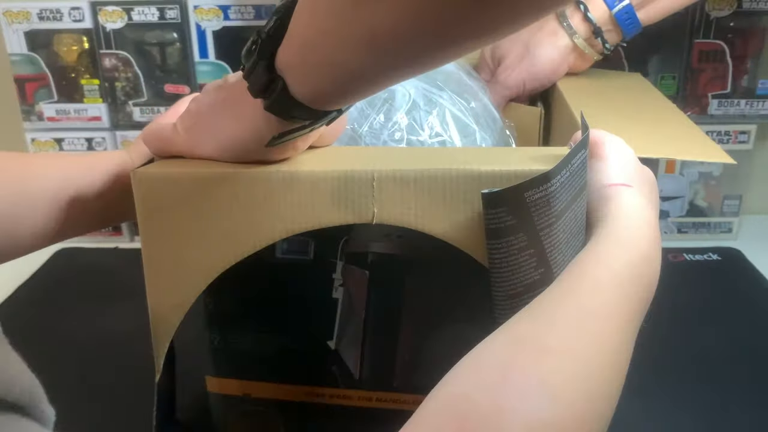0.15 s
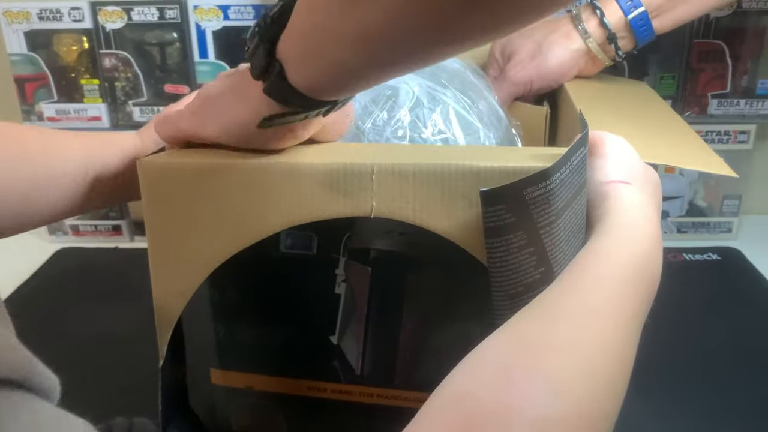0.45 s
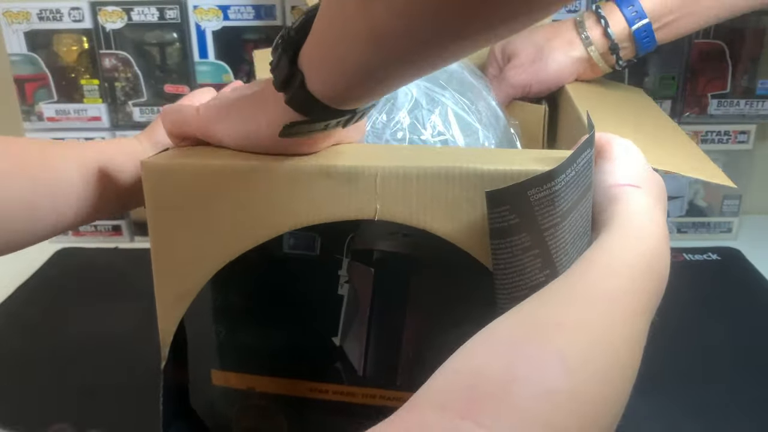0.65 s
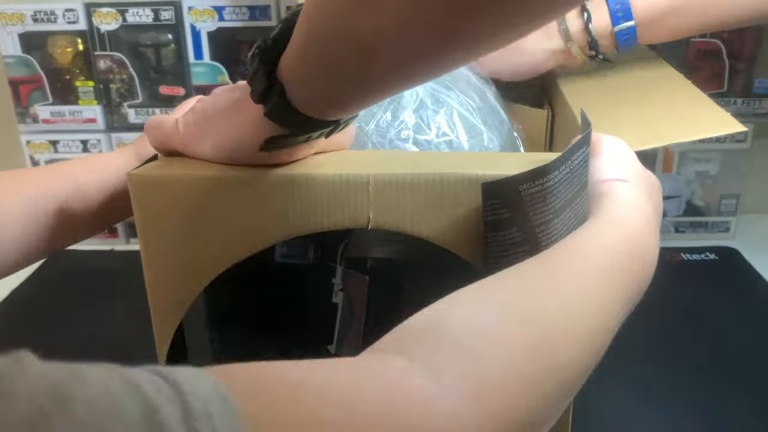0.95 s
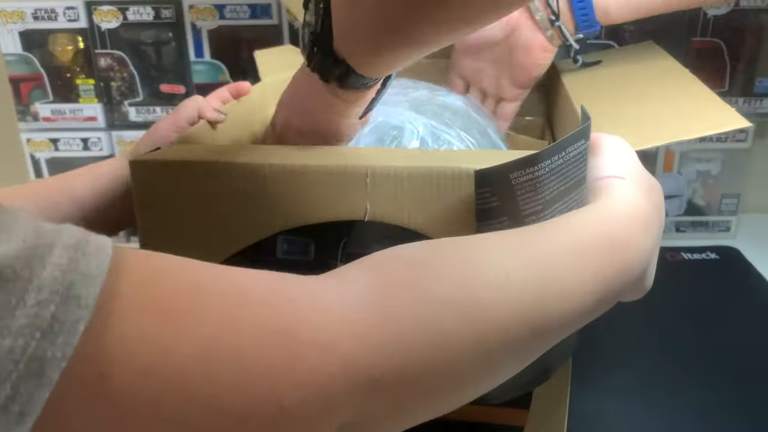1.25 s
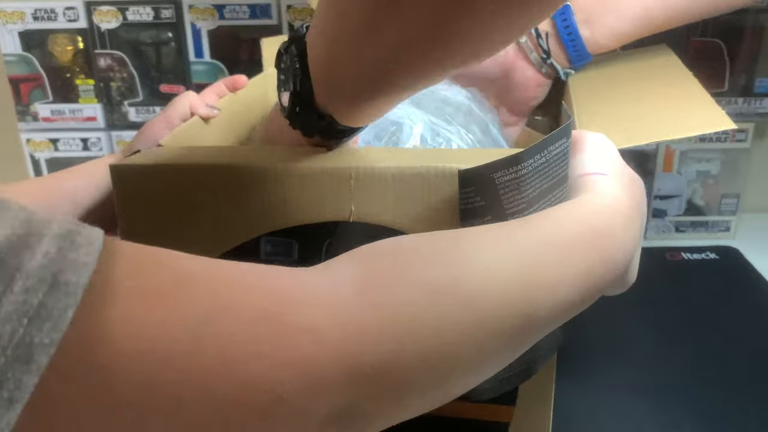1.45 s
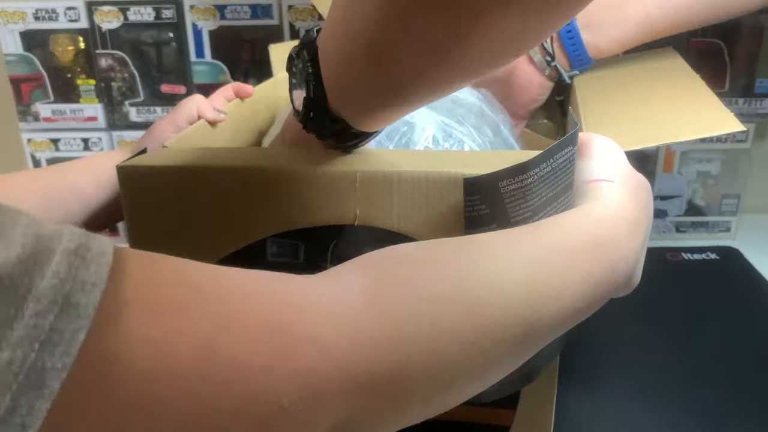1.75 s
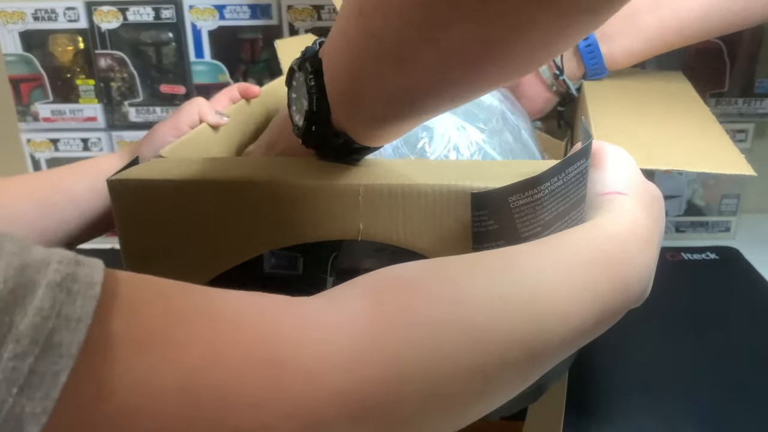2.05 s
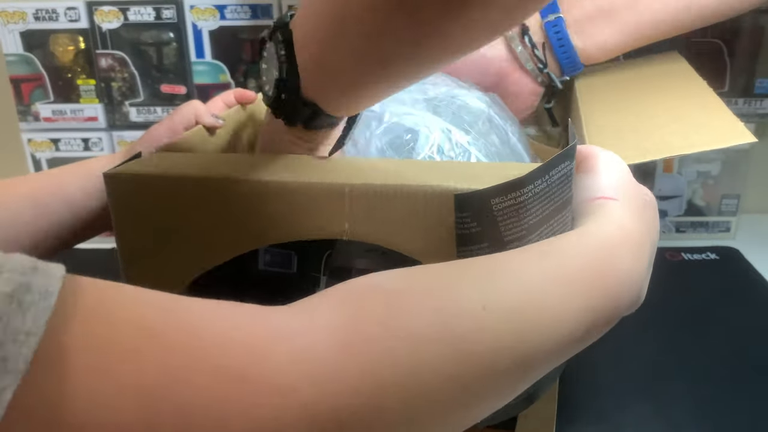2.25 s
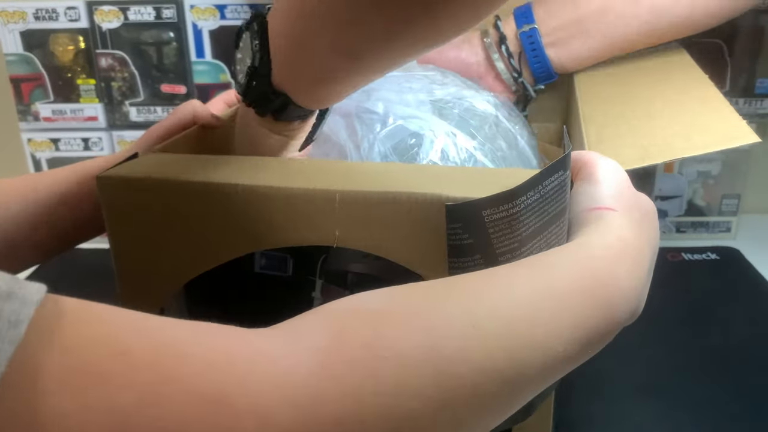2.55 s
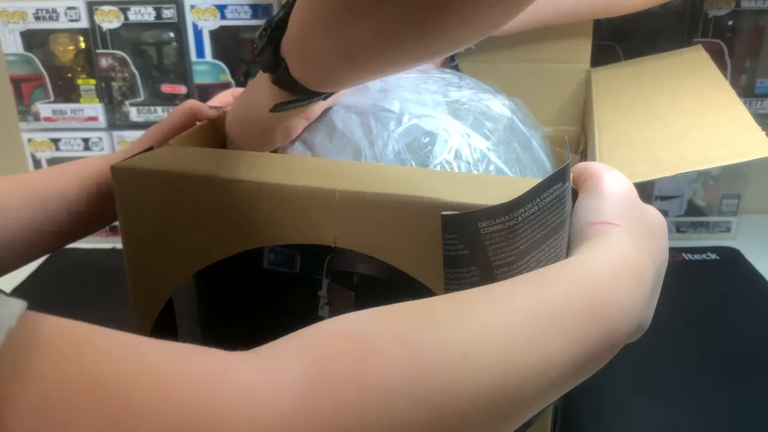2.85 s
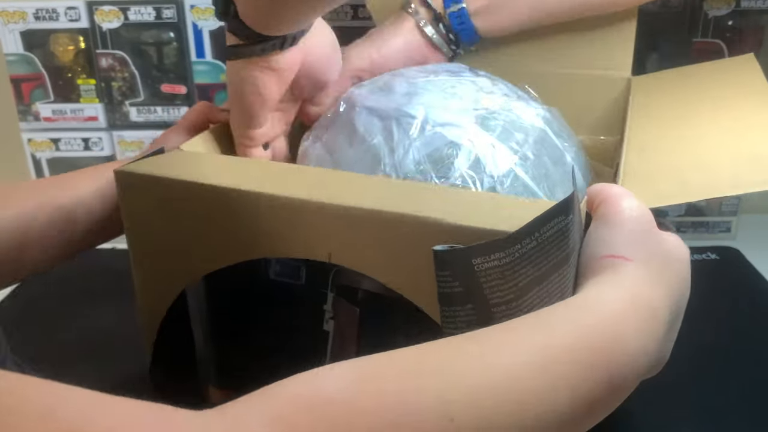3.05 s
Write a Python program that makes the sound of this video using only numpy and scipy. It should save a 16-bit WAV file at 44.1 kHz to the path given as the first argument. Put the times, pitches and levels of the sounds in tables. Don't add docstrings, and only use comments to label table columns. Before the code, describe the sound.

Stiff cardboard packing cracks and pops while hands rub the carton and plastic wrap rustles.

```python
import sys
import numpy as np
from scipy import signal
from scipy.fft import rfft, irfft
from scipy.io import wavfile
from scipy.ndimage import uniform_filter1d

SR = 44100
rng = np.random.default_rng(int(sys.argv[2]) if len(sys.argv) > 2 else 0)


def voltage_ratio(decibels):
    exponent = np.asarray(decibels, float) / 20
    return 10 ** exponent


def generate_wav(sig):
    pcm = np.round(np.clip(np.atleast_2d(sig).T, -1, 1) * 32767).astype(np.int16)
    wavfile.write(sys.argv[1], SR, pcm)


N = 141120

# (frequency [Hz], level [dB])
HUM_SPECTRUM = [(59, -54), (100, 12), (181, 18), (801, 9), (10200, -5), (16000, -65)]
# (start [s], length [s], board rubbing [dB], wrap rustle [dB], low scuff [dB])
STROKES = [(-.08, 0.29, -45, -49.5, -76), (0.213, 0.068, -51, -46.5, -70), (0.34, 0.061, -49, -62, -85),
           (0.476, .16, -45.5, -47, -80), (0.594, 0.19, -39.5, -45, -36), (0.73, 0.37, -45.5, -47, -63),
           (0.972, 0.16, -39.5, -44, -65), (1.138, 0.19, -34, -44.5, -47), (1.244, 0.19, -35, -38.5, -42.5),
           (1.404, 0.13, -34.5, -40, -46.5), (1.604, 0.25, -39.5, -48.5, -48),
           (1.841, 0.17, -41.5, -52, -48), (2.06, 0.71, -36.5, -41.5, -54), (2.654, 0.21, -29.5, -39, -40),
           (2.815, 0.23, -40.5, -40, -45.5), (2.953, 0.45, -38, -41.5, -48.5), (3.11, 0.37, -60, -36, -80)]
# (board rubbing, wrap rustle, low scuff) [dB]
REST_DB = [-53, -57, -56]
# (frequency [Hz], level [dB])
BOARD_SPECTRUM = [(59, -63), (100, -16.5), (355, -42), (693, -7.5), (768, -3.5), (1470, -7.5), (2070, -11),
                  (3290, -26), (6000, -40), (9000, -60)]
# (frequency [Hz], level [dB])
SCUFF_SPECTRUM = [(150, -5), (260, -4.5), (450, -6), (650, -11)]
# (frequency [Hz], level [dB])
WRAP_SPECTRUM = [(1200, -26), (1830, -10), (3150, -10), (7390, -13), (14600, -18), (16000, -15)]
# (time [s], frequency [Hz], level [dB])
SQUEAK = [
    (1.362, 1784, -62),
    (1.375, 2030, -17.5),
    (1.378, 1610, -21.5),
    (1.387, 1534, -16),
    (1.393, 1610, -53),
    (1.404, 1670, -32),
    (1.41, 1560, -48),
]
# (time [s], level [dB], push length [s])
THUDS = [
    (1.2057, -16, 0.0041),
    (1.212, -11.5, 0.0017),
    (2.609, -15.5, 0.001),
    (2.954, -26, 0.0008),
]
# (frequency [Hz], level [dB])
THUD_MODES = [(320, -16), (390, -15), (460, 23)]
# (time [s],
# level [dB], frequency [Hz], rise [s])
POPS = [(0.053, -23, 1550, 0.0017), (0.666, -5, 2920, 0.00033), (0.67, -8.5, 787, 0.0016),
        (0.843, -21.5, 690, 0.0021), (0.981, -17.5, 801, 0.0035), (1.0792, -21, 5050, 0.00023),
        (1.2052, -0.5, 417, 0.0021), (1.214, -12.5, 786, 0.0017), (1.258, -25, 393, 0.0036),
        (1.268, -22, 900, .003), (1.282, -26, 2270, 0.0015), (1.301, -26, 1525, 0.0028),
        (1.306, -23, 778, 0.0072), (1.316, -22, 800, 0.0081), (1.314, -22.5, 413, 0.0059),
        (1.325, -19, 970, 0.0025), (1.333, -17, 402, 0.0029), (1.383, -23, 450, 0.0028),
        (1.431, -16, 1170, 0.00092), (1.433, -22.5, 845, 0.0021), (1.439, -18, 1590, 0.0016),
        (1.561, -3, 816, 0.0026), (1.806, -7, 3670, 0.0012), (1.809, -5.5, 586, 0.0022),
        (1.852, 4, 1823, 0.00078), (1.854, -5.5, 877, 0.0028), (2.045, -10.5, 950, 0.0022),
        (2.209, -19, 897, .002), (2.261, -18.5, 720, 0.0022), (2.279, -19.5, 1650, 0.00093),
        (2.283, -17, 630, 0.0015), (2.341, -21.5, 804, 0.0043), (2.375, -20, 437, 0.0015),
        (2.389, -22.5, 1990, .0015), (2.424, -17, 772, 0.0025), (2.472, -24, 816, 0.0018),
        (2.53, -7, 2250, .0015), (2.732, -21, 1005, 0.0014), (2.753, -17, 1060, 0.0015),
        (2.782, -9.5, 650, 0.001), (2.812, -19, 1620, 0.0023), (2.815, -23.5, 340, 0.0028),
        (2.939, -10.5, 1810, 0.0005), (2.943, -22, 340, 0.002), (2.958, -15, 1274, .002),
        (2.964, -11.5, 1004, 0.0016), (2.96, -17.5, 317, 0.0014), (3, -20.5, 1600, .002),
        (3.02, -23, 667, 0.0034), (3.087, -22.5, 977, 0.0023)]
# (time [s], box ring [dB], crack [dB], film [dB], slip length [s])
SNAPS = [(0.666, -10, -18, -55, 0.0025), (1.08, -30, -21, -7.5, 0.00072), (1.204, -7, -22.5, -43, 0.0026),
         (1.559, -0.5, -1, 0.5, 0.00073), (1.8056, 0, -4.5, -5, 0.0032), (1.815, -11.5, -17, -24, 0.0029),
         (1.848, 3.5, -3, 1, 0.0053), (2.005, -3, -14, -11, 0.0092), (2.0397, 4.5, -5.5, -4, 0.0016),
         (2.101, -10, -19.5, -14, 0.022), (2.1085, 3, -6, -14, 0.001), (2.53, -7, -13.5, -23, 0.016),
         (2.546, -20, -19, -10.5, 0.0036), (2.592, -16.5, -37, -9.5, 0.025), (2.601, -2, -12, -4, 0.005),
         (2.734, -7, -16.5, -4.5, 0.00063), (2.941, -15, -23.5, -10.5, 0.01),
         (2.956, -5.5, -27, -19, 0.0016), (2.962, -17.5, -46, -26, 0.002)]
# (time [s], box ring [dB], crack [dB], film [dB])
TAPS = [(0.01, -26.5, -34.5, -28), (0.052, -12.5, -50, -59), (0.539, -34, -41, -30.5),
        (0.606, -29.5, -38, -22.5), (0.841, -22, -54, -55), (0.899, -14.5, -45, -34),
        (0.98, -18.5, -28.5, -55), (1.11, -22, -39, -56), (1.245, -38, -29.5, -44),
        (1.334, -14.5, -44, -54), (1.427, -17, -52, -49), (1.441, -39, -36, -17),
        (1.535, -26, -30.5, -21.5), (1.691, -16.5, -40, -45), (1.704, -22.5, -47, -53),
        (1.77, -17.5, -34.5, -24), (1.992, -15, -46, -31), (2.206, -24, -33, -29.5),
             (2.259, -17.5, -49, -31), (2.282, -18.5, -34, -28), (2.34, -14.5, -42, -45),
             (2.389, -24, -50, -21.5), (2.425, -22, -62, -59), (2.47, -16, -57, -31.5),
             (2.688, -16.5, -46, -22), (2.709, -32, -52, -40), (2.755, -8.5, -35, -46),
             (2.782, -11, -35, -26), (2.813, -24, -28, -17.5), (2.868, -21.5, -52, -27),
             (2.999, -16, -31, -20.5), (3.019, -35, -34, -14.5), (3.056, -17.5, -30.5, -31),
             (3.085, -19, -54, -23), (3.141, -24, -36, -20.5)]
# (box, crack, film) [dB]
TRIM_DB = [-1, 12, 2]
# (frequency [Hz], level [dB])
BOX_MODES = [(310, -22), (462, 2), (590, 0), (670, 0), (800, 3), (920, 2), (1020, -3), (1190, -6)]
# (frequency [Hz], level [dB])
PACKING_MODES = [(1400, -26), (1770, 14.5), (1930, 13), (2240, 17), (2400, -35), (2750, 1.5), (3150, 8),
                 (3450, 4.5), (3720, -37)]
# (frequency [Hz], level [dB])
FILM_SPECTRUM = [(3500, -5), (5000, -1.5), (9000, -4), (15500, -19)]

HUM_DB = -56
ROOM_DB, ROOM_T60_S = -8.5, 0.099
TREBLE_HZ, TREBLE_T60_S = 4000, 0.08
SIDE_DB, SIDE_HZ = -3.5, 3440
SPREAD_DB, PORT_LAG_S = -1, 0.8e-5
STROKE_EDGE = 0.45
PATCHY_DB, RUSTLE_DB, KNOCKS_DB = 3, 1.2, -3
FINE_HZ = 6000
SCATTER_DB, DETUNE = 2.5, 0.012
BOX_T60_S, PACKING_T60_S, THUD_T60_S = 0.033, 0.009, 0.025
POP_SPREAD = 0.06
LEAD_S = 0.006
CREAK_S, CREAK_DB = 0.002, -13
TICK_S, TICK_DB, TAP_TICK_DB = 0.00085, 16.5, 4
TAP_SLIP_S, BOX_LATE_S = 0.0056, 0.0041
FILM_TICK_SHARE, FILM_WIDE_DB = 0.5, -1
PORTS = np.array([[1], [-1]])


def colour(x, points):
    hz, db = np.array(points, float).T
    f = np.arange(len(x) // 2 + 1) * SR / len(x) + 1
    gain_db = np.interp(np.log(f), np.log(hz), db, left=-70, right=db[-1] - 30)
    y = irfft(rfft(x) * voltage_ratio(gain_db), len(x))
    return y / np.std(y)


def walk(rate):
    k = int(SR / rate)
    steps = np.repeat(rng.standard_normal(N // 40), k)[:N]
    return 1.3 * uniform_filter1d(uniform_filter1d(steps, k), k)


def grains(rate, spread_db):
    chance, sign, size = rng.random((3, N))
    return (chance < rate / SR) * np.sign(sign - 0.5) * voltage_ratio(-spread_db * np.log(size + 0.01))


def decay(t, t60):
    return np.exp(-np.log(1000) * t / t60)


def ring(modes, t60, scatter):
    hz, db = np.array(modes).T
    t, k = np.arange(3000)[:, None] / SR, len(hz)
    detuned = hz * (1 + DETUNE * scatter[20:20 + k])
    return (np.sin(2 * np.pi * detuned * t) * decay(t, t60)) @ voltage_ratio(db + SCATTER_DB * scatter[:k])


def add(out, s, sound, db):
    i = int(s * SR)
    out[i:i + len(sound)] += (sound * voltage_ratio(db) / np.abs(sound).max())[:N - i]


def split(x, hz):
    low = signal.sosfilt(signal.butter(1, 1. * hz, fs=SR, output="sos"), x)
    return low, x - low


def hum():
    return voltage_ratio(HUM_DB) * np.array([colour(rng.standard_normal(N), HUM_SPECTRUM) for _ in range(2)])


def room(dry):
    t = np.arange(12000) / SR
    low, high = split(rng.standard_normal((2, 12000)), TREBLE_HZ)
    tails = low * decay(t, ROOM_T60_S) + high * decay(t, TREBLE_T60_S)
    tails = tails * np.minimum(t / 0.0005, 1)
    tails /= np.sqrt(np.sum(tails ** 2, axis=1, keepdims=True))
    mid, side = (signal.fftconvolve(dry, h)[:N] for h in tails)
    side = signal.sosfilt(signal.butter(1, 1. * SIDE_HZ, "high", fs=SR, output="sos"), side)
    return voltage_ratio(ROOM_DB) * mid, voltage_ratio(SIDE_DB) * side


def wrap_crinkle():
    out, rest = 0, colour(grains(3000, 3.1), WRAP_SPECTRUM)
    for hz in FINE_HZ * np.array([0.5, 1, 2, 3]):
        band = signal.sosfiltfilt(signal.butter(2, hz, fs=SR, output="sos"), rest)
        out = out + band * voltage_ratio(PATCHY_DB * walk(40.07))
        rest = rest - band
    return out


def board_rubbing():
    slip = grains(2000, 3.28) * voltage_ratio(PATCHY_DB * walk(45))
    blows = slip * np.sqrt(np.abs(slip))
    knocks = signal.fftconvolve(blows, ring(BOX_MODES, BOX_T60_S, np.zeros(40)))[:N]
    return colour(slip, BOARD_SPECTRUM) + voltage_ratio(KNOCKS_DB) * colour(knocks, [(300, 0), (3000, 0)])


def hands():
    effort = np.ones((N, 1)) * voltage_ratio(np.array(REST_DB))
    for s, length, *db in STROKES:
        u = (np.arange(N) / SR - s) / length
        swell = np.clip(np.minimum(u, 1 - u) * 2 / STROKE_EDGE, 0, 1) ** 2
        effort = effort + swell[:, None] * voltage_ratio(np.array(db))
    board, rustle, low = effort.T
    scuff = colour(grains(400, 2.3), SCUFF_SPECTRUM)
    crumple = rustle * voltage_ratio(RUSTLE_DB * walk(78))
    wrap, wide = (wrap_crinkle() * crumple for _ in range(2))
    return board_rubbing() * board + scuff * low + wrap, wide


def squeak():
    t, (s, hz, db) = np.arange(N) / SR, np.array(SQUEAK).T
    pitch = np.interp(t, s, hz) * (1 + 0.027 * walk(620))
    phase = 2 * np.pi * np.cumsum(pitch) / SR
    level = voltage_ratio(np.interp(t, s, db, left=-120, right=-120))
    return (np.sin(phase) + voltage_ratio(-38) * np.sin(2 * phase)) * voltage_ratio(6.78 * walk(600)) * level


def thuds():
    out = np.zeros(N)
    for s, db, length in THUDS:
        push = np.hanning(int(length * SR) + 3)
        add(out, s, np.convolve(push, ring(THUD_MODES, THUD_T60_S, 0.1 * rng.standard_normal(40))), db)
    return out


def pops():
    out, t, partial = np.zeros(N), np.arange(2500) / SR, np.arange(3)
    for s, db, hz, rise in POPS:
        detune, phase = rng.standard_normal((2, 3))
        partial_hz = hz * (1 + POP_SPREAD * detune * partial)
        tone = np.sin(2 * np.pi * partial_hz * t[:, None] + phase * partial) @ voltage_ratio(np.array([0, -6, -9]))
        add(out, s, tone * t * np.exp(-t / max(rise, 3e-4)), db)
    return out


def snaps():
    out, wide = np.zeros(N), np.zeros(N)
    t = np.arange(2048) / SR - LEAD_S
    after = np.maximum(t, 0)
    box_trim, crack_trim, film_trim = TRIM_DB
    rows = [(*r, TICK_DB) for r in SNAPS]
    rows += [(*r, TAP_SLIP_S, TAP_TICK_DB) for r in TAPS]
    for s, box_db, crack_db, film_db, slip, tick_db in rows:
        push, grit, box_scatter, packing_scatter, film, ragged, film_wide = rng.standard_normal((7, 2048))
        ragged_db = 4.2 * uniform_filter1d(ragged, size=24) * 5.23
        slips = np.exp(-after / max(slip, 3e-4)) * voltage_ratio(ragged_db)
        creak = voltage_ratio(CREAK_DB) * np.exp(t / CREAK_S)
        tick = voltage_ratio(tick_db) * np.exp(-after / TICK_S)
        sharp = np.where(t < 0, creak, slips + tick)
        late_push = np.diff(push * slips * np.minimum(after / BOX_LATE_S, 1))
        box = signal.fftconvolve(late_push, ring(BOX_MODES, BOX_T60_S, box_scatter))
        crack = signal.fftconvolve(np.diff(grit * sharp), ring(PACKING_MODES, PACKING_T60_S, packing_scatter))
        spit = sharp * FILM_TICK_SHARE + (1 - FILM_TICK_SHARE) * slips * (t >= 0)
        start = s - LEAD_S
        add(out, start, box, box_db + box_trim)
        add(out, start, crack, crack_db + crack_trim)
        add(out, start, colour(film, FILM_SPECTRUM) * spit, film_db + film_trim)
        add(wide, start, colour(film_wide, FILM_SPECTRUM) * spit, film_db + film_trim + FILM_WIDE_DB)
    return out, wide


def scene():
    rubbing, rustle_wide = hands()
    cracks, spit_wide = snaps()
    dry = rubbing + squeak() + thuds() + pops() + cracks
    mid, side = room(dry)
    f = np.arange(N // 2 + 1) * SR / N
    lag = np.exp(1j * np.pi * f * PORT_LAG_S * PORTS)
    centre = irfft(rfft(dry + mid) * lag, N)
    return centre + (side + voltage_ratio(SPREAD_DB) * (rustle_wide + spit_wide)) * PORTS + hum()


def top_cut(x):
    return signal.sosfilt(signal.butter(12, 17010, fs=SR, output="sos"), x)


def record(dry):
    x = signal.sosfilt(signal.butter(2, 190, "high", fs=SR, output="sos"), dry)
    x = signal.sosfilt(signal.ellip(8, 0.2, 60, 15800, fs=SR, output="sos"), x)
    x = np.clip(x, -1, 1)
    return top_cut(x - x ** 5 / 20)


dry = scene()
out = record(dry)
generate_wav(out)
```